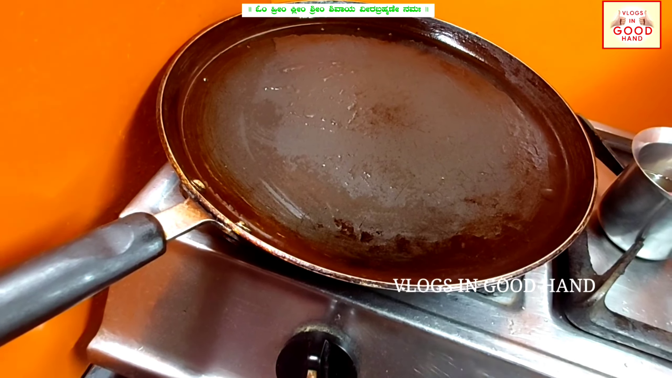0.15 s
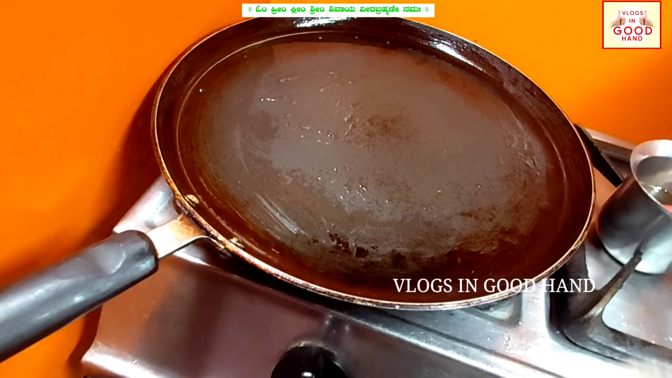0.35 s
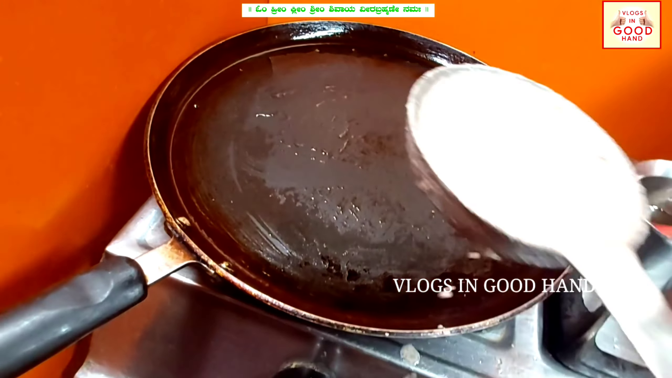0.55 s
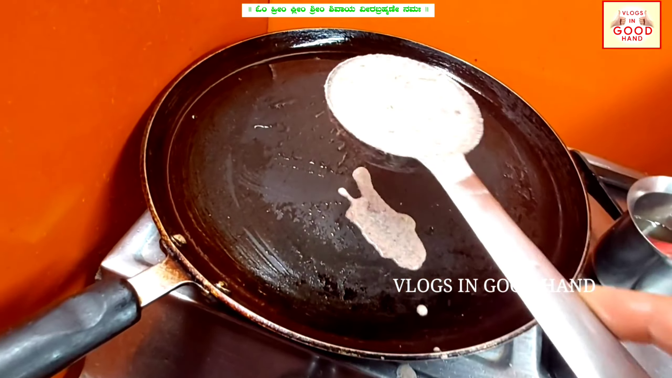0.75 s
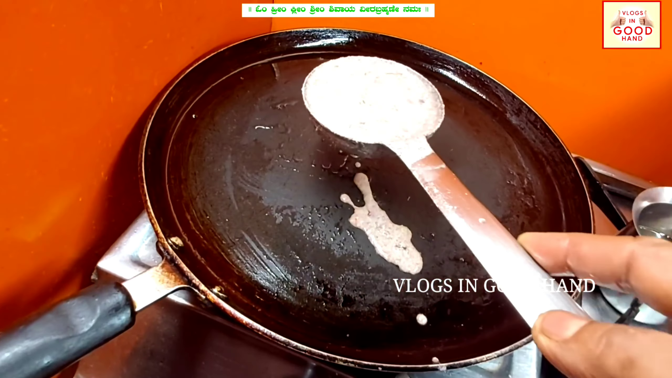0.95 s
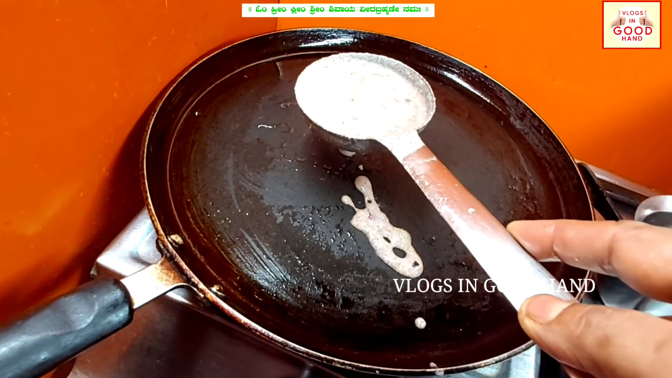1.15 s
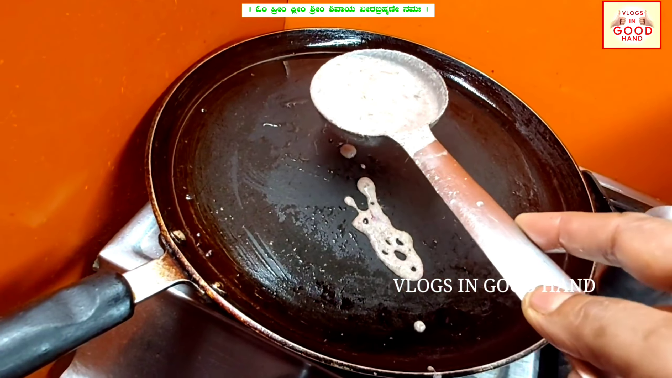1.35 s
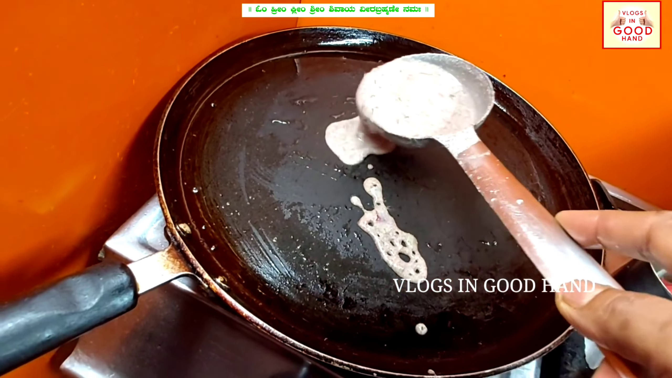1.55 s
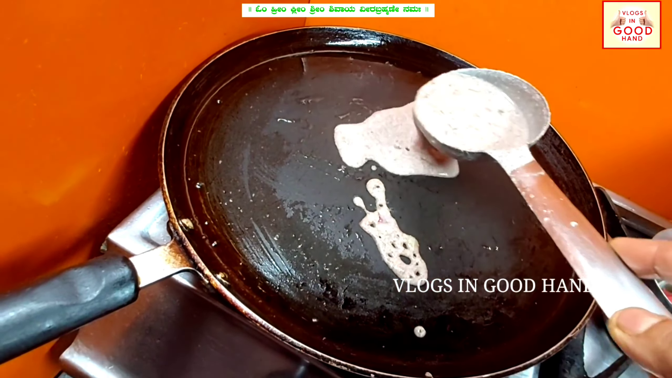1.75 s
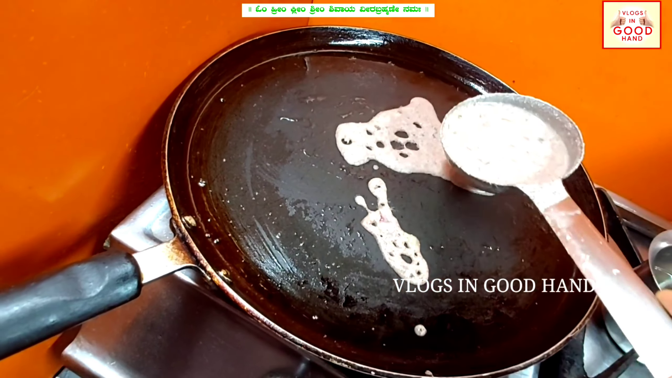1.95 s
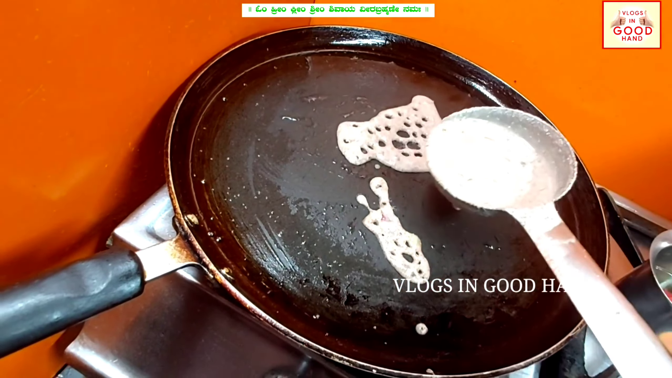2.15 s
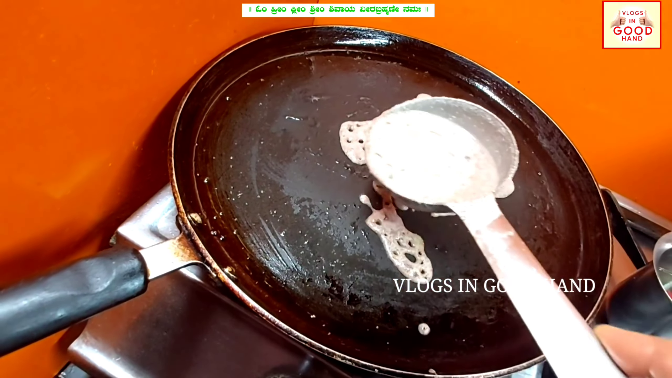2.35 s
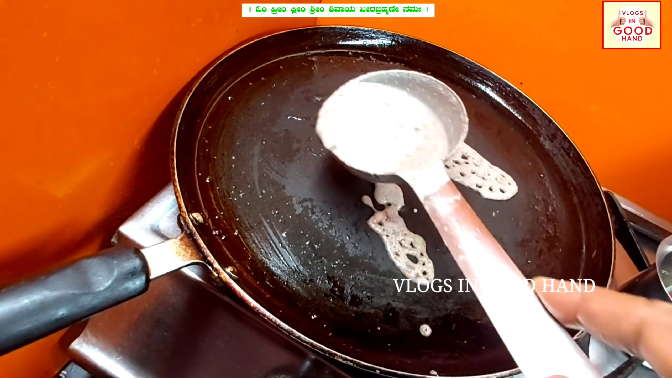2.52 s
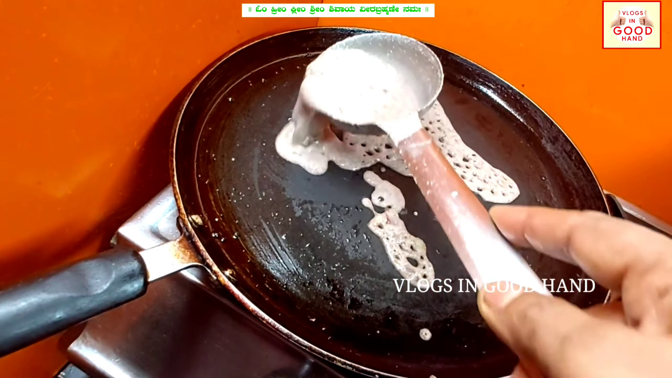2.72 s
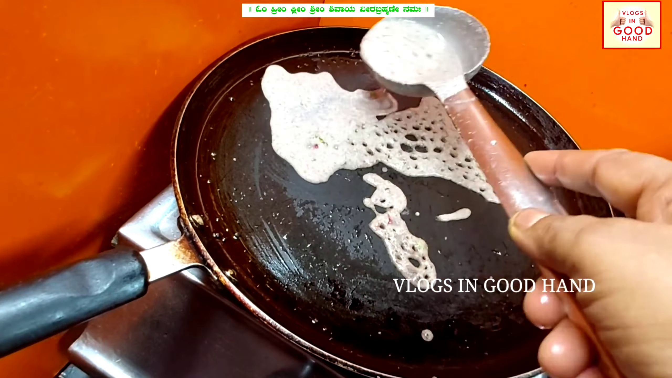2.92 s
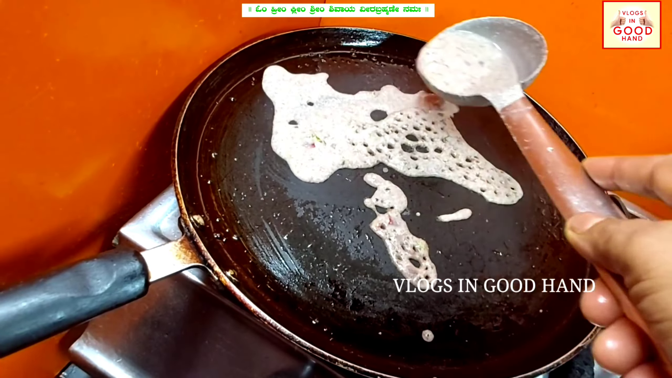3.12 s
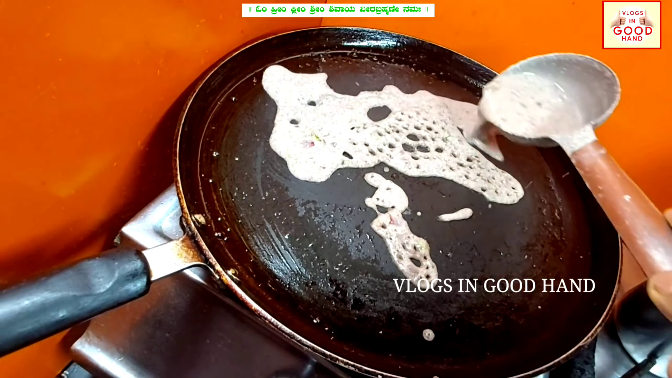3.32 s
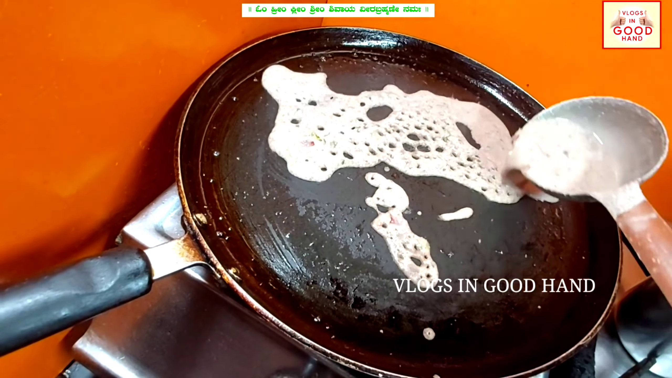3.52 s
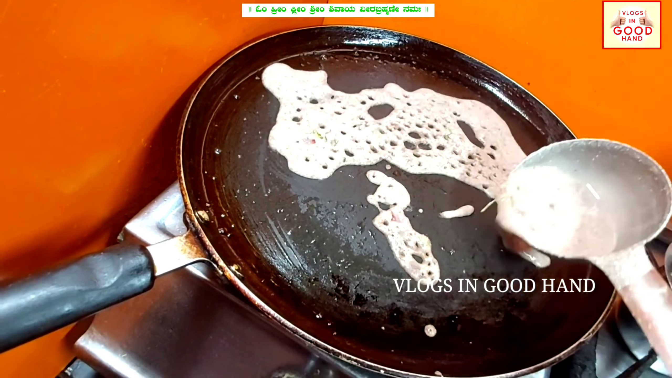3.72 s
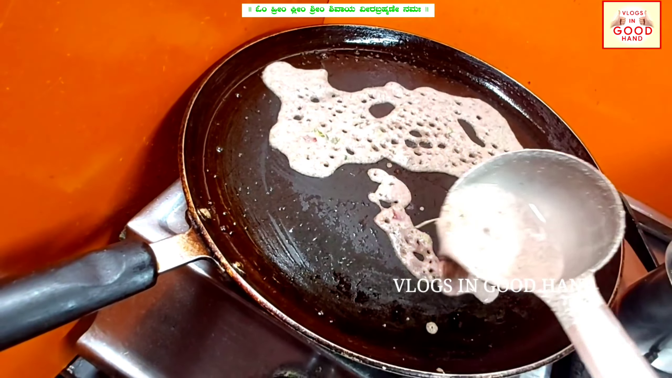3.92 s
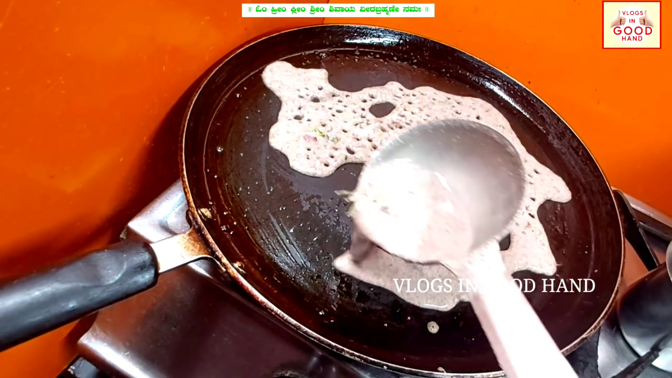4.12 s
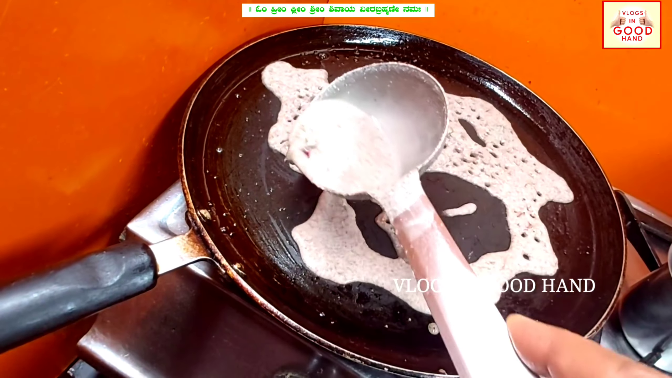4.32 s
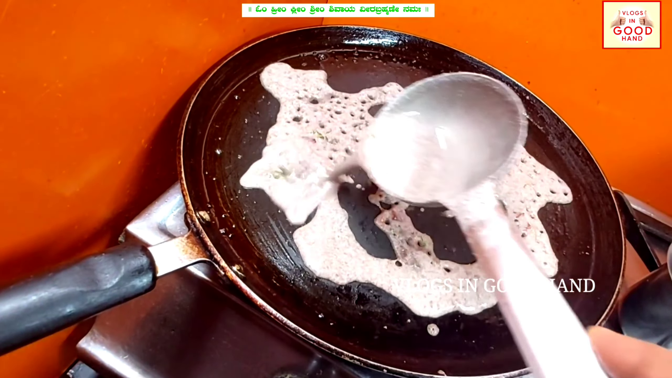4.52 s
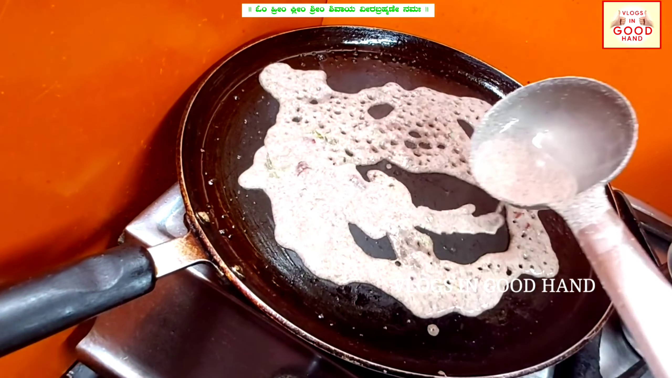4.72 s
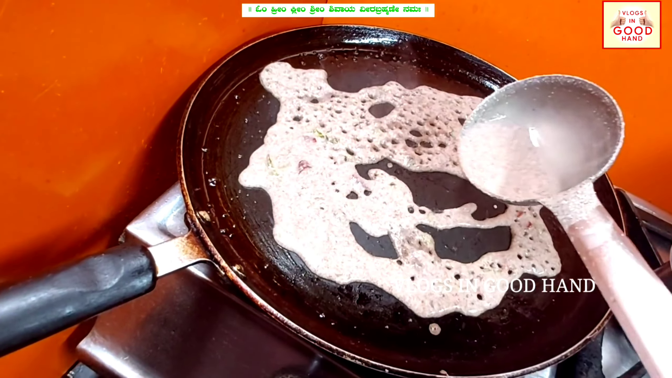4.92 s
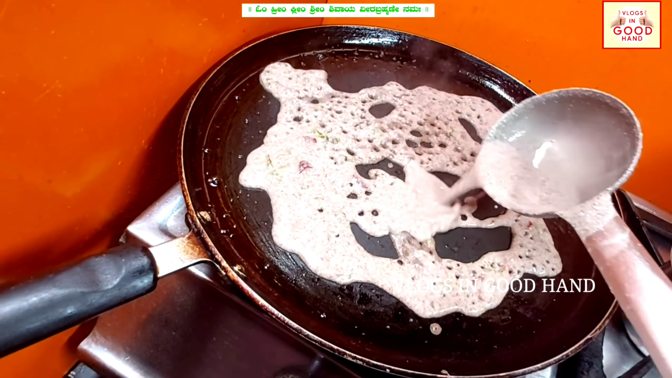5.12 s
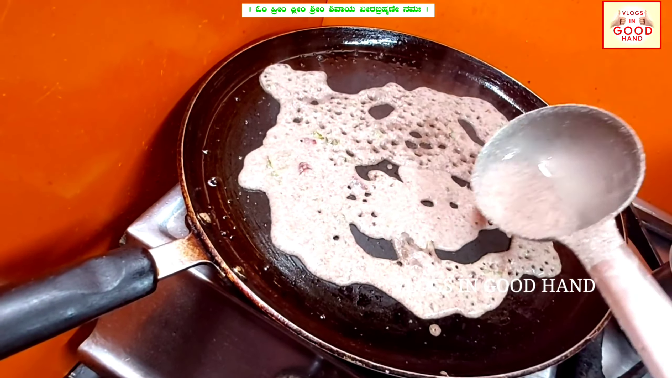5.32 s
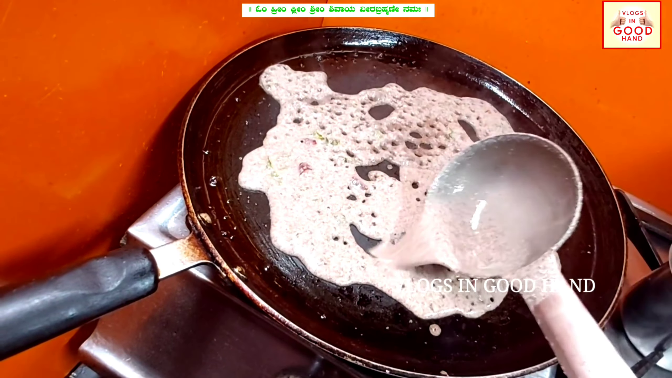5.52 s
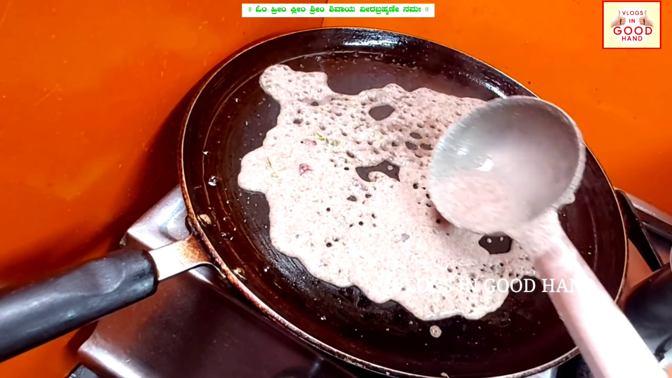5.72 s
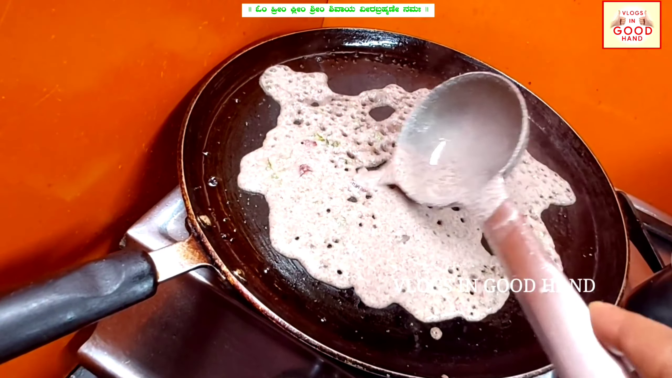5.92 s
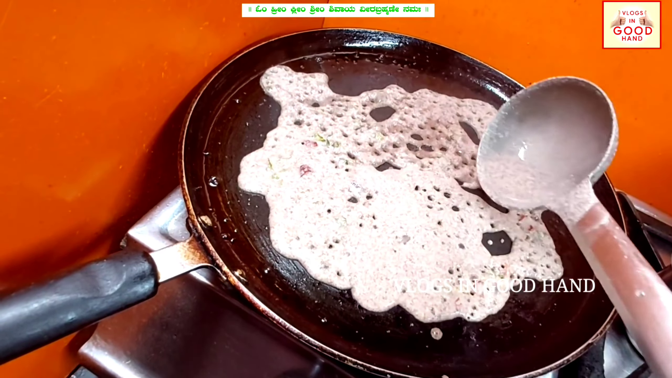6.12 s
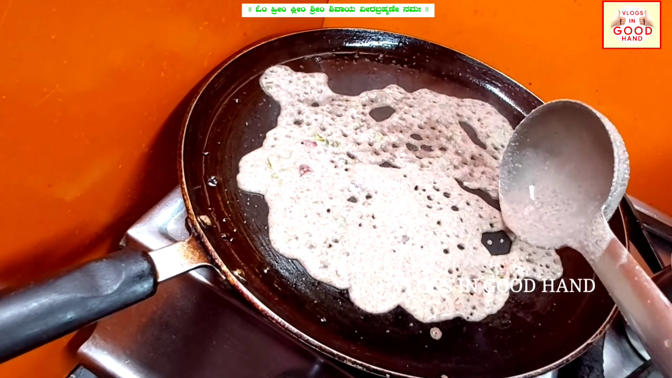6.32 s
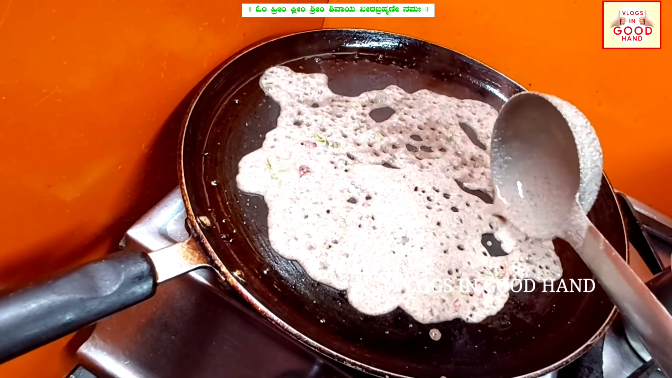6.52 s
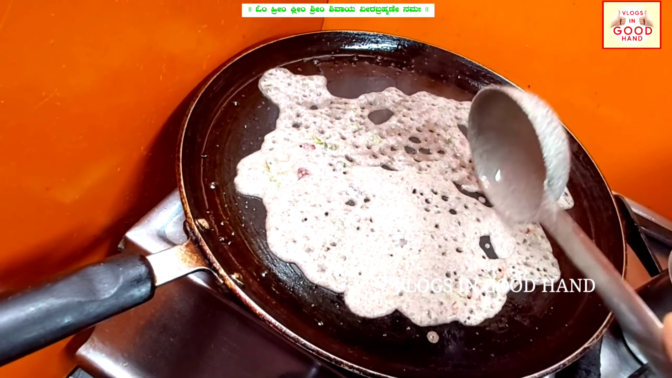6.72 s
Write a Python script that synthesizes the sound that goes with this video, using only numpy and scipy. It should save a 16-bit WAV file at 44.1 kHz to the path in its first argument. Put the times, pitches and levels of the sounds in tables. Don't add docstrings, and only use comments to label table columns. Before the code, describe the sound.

Thin batter lands on a hot oiled griddle, bursting into loud wet sizzle with fizzing steam, blunt bubble pops and sharp oil spits, heard close.

```python
import sys
import numpy as np
from scipy import signal
from scipy.fft import rfft, irfft
from scipy.io import wavfile
from scipy.ndimage import uniform_filter1d

SR = 44100
rng = np.random.default_rng(int(sys.argv[2]) if len(sys.argv) > 2 else 0)


def file_out(sig):
    cols = np.atleast_2d(sig).T
    lim = np.clip(cols, -1, 1)
    pcm = np.round(lim * 32767).astype(np.int16)
    wavfile.write(sys.argv[1], SR, pcm)


def decibels_to_gain(level_db):
    exponent = np.asarray(level_db, float) / 20
    return 10 ** exponent


N = 302526
T = np.arange(N) / SR
LAG_S = 0.00018

# start_s, level_db, dullness_db (of the lower part, rises as batter covers metal)
BOILING = [(.66, -66, 4.5), (.78, -41.5, -11), (.83, -25.5, -29), (.9, -22.5, -16.5), (.98, -26, -5),
           (1.21, -32.5, -6.5), (1.31, -28.5, -8.5), (1.45, -30.5, -8), (1.66, -33.5, -5.5),
           (1.73, -22.5, -20.5), (1.88, -21, -11), (2.15, -26, -1.5), (2.2, -30, -2.5), (2.82, -32, -7),
           (2.92, -25.5, -8.5), (3.5, -22.5, -6.5), (4.99, -27, 0.5), (6.86, -33.5, 2.5)]
# start_s, level_db
FIZZ_START = [(.66, -56), (.664, -47), (.739, -41), (.744, -33), (.8, -29), (.83, -24.5)]


def boil():
    # frequency_hz, density_db (per Hz)
    body_colour = [(350, -32), (600, -18), (977, -13.5), (1230, -17), (1460, -7.5), (1850, -6),
                   (2380, -3.5), (2890, -3.5), (3120, -6), (3330, -2), (4040, -4), (5190, -16),
                   (5780, -9.5), (6580, -23), (8000, -18), (10400, -52), (17600, -120)]
    # frequency_hz, width_hz, left_db, right_db
    weak_modes = [(980, 46, -27.5, -30), (1096, 32, -21, -22.5), (1410, 11, -46.5, -13.5),
                  (1580, 84, -20, -55), (1732, 6.7, -24.5, -14.5), (2053, 16.7, -13.5, -19),
                  (2757, 28, -14, -40), (2826, 27, -18.5, -53), (4180, 43, -7, -10.5),
                  (4417, 38, -14.5, -7.5), (4713, 43, -10, -13), (5080, 30, -10, -31), (6030, 31, -19, -30),
                  (6130, 86, -17, -50)]
    # frequency_hz, width_hz, left_db, right_db, group
    strong_modes = [(2400, 85, -8, -20, 1), (3070, 90, -4, -19, 2), (3165, 110, -4, -19, 2),
                    (3432, 65, -7, -18, 3), (3503, 60, -4, -16, 3), (3890, 110, -8, -18, 4),
                    (3985, 110, -4, -11, 4)]
    # start_s, length_s, drive_db
    ringing = [
        [(.93, .02, -23), (1.28, .02, -32.5), (1.74, .4, -27.5), (2.0, .04, -12), (2.32, .02, -23),
         (3.02, 2.5, -29), (4.75, .32, -29), (5.36, .02, -26), (6.3, 0.17, -30)],
        [(.93, .05, -32), (1.78, 0.27, -25), (2.88, 1.24, -26), (4.2, 0.77, -30)],
        [(.83, 0.26, -24.5), (1.26, 0.056, -30), (1.78, .3, -26), (2.1, 0.022, -20), (2.98, .02, -25),
         (3.4, 0.6, -29.5), (4.0, 0.68, -31), (5.36, .02, -40)],
        [(.84, 0.081, -26.5), (1.27, 0.13, -27.5), (1.72, 0.2, -24.5), (2.75, .4, -34), (3.35, 0.66, -27),
         (4.1, 0.41, -30)],
    ]

    strikes = rng.standard_normal((2, N)) - .7 * evened(bursts(5000, 3.0))
    dullness_db = curve(BOILING, 2)

    low_hz, high_hz = 1340, 3320

    def body_db(hz, t):
        share = np.clip(np.log(high_hz / (hz + 1)) / np.log(high_hz / low_hz), 0, 1)
        return read(body_colour, hz) + share * (curve(BOILING, 2, t) + 6)

    body = coloured(strikes, body_db, patchy_db=1.19)

    early = np.roll(strikes[0], -round(LAG_S * SR))
    metal = evened(np.array([strikes[0], early + 0.34 * strikes[1]]))
    weak = np.zeros((2, N))
    for hz, width_hz, left_db, right_db in weak_modes:
        mode = evened(wavering(3) * resonate(metal, hz, 1.5 * width_hz))
        weak += decibels_to_gain(np.array([[left_db], [right_db]])) * mode

    damping_db = 0.28 * np.clip(dullness_db + 8, 0, 12)
    lean_db = -1.07 - 0.32 * np.maximum(dullness_db, -20)
    level = decibels_to_gain(curve(BOILING, 1)) * wavering(0.46) * sides(lean_db)
    out = level * (decibels_to_gain(3.0) * evened(body) + decibels_to_gain(-3.0 - damping_db) * weak)

    idle_db = curve(BOILING, 1) - 13
    range_db = 18
    drives = []
    for rows in ringing:
        drive_db = spells(rows, rise_db_per_s=400, fall_db_per_s=141)
        drives.append(decibels_to_gain(np.clip(drive_db, idle_db, idle_db + range_db)))
    for hz, width_hz, left_db, right_db, group in strong_modes:
        mode = resonate(resonate(metal, hz, width_hz), hz, 1.5 * width_hz)
        mode = evened(wavering(2.2) * mode)
        out += drives[group - 1] * decibels_to_gain(4.5 + np.array([[left_db], [right_db]])) * mode
    return out


def fizz():
    fizz_level = FIZZ_START + [(.86, -29), (1.04, -27.5), (1.64, -32), (1.83, -28), (2.15, -27.5),
                  (2.45, -29.5), (3.02, -30.5), (3.38, -28), (3.63, -28), (4.35, -29), (5.7, -30.5),
                  (6.86, -32.5)]
    # frequency_hz, density_db (per Hz)
    hiss_colour = [(1760, -20), (3000, -5.5), (3870, -16.5), (4240, -6), (6020, -7), (6540, -3),
                   (7510, -5.5), (9050, -4), (14600, -2), (15600, -6)]

    decay_s = .01
    flares = signal.lfilter([1], [1, -np.exp(-1 / (decay_s * SR))], bursts(40, 3.0).sum(0))
    hiss = rng.standard_normal((2, N)) - .7 * evened(bursts(5000, 3.0))
    hiss = hiss * (1 + .09 * flares)
    hiss = coloured(hiss, lambda hz, t: read(hiss_colour, hz), patchy_db=1.0, size=256)
    lean_db = -0.9 + 0.35 * np.maximum(curve(BOILING, 2), -20)
    return decibels_to_gain(curve(fizz_level, 1) + 6.5) * wavering(0.26) * sides(lean_db) * evened(hiss)


def gurgle():
    # start_s, level_db, deepest_db (its deepest part swells apart)
    gurgle_level = [(.74, -56, -3.5), (1.03, -39.5, -1), (1.42, -41, -7), (1.7, -50, -14), (2.2, -39.5, -2),
                    (2.5, -42.5, -2.5), (3.03, -47.5, -14), (3.3, -43.5, -9.5), (5.2, -40.5, -4.5),
                    (5.8, -41.5, -5), (6.04, -45.5, -22), (6.86, -43.5, -6)]
    # frequency_hz, density_db (per Hz)
    wash_colour = [(15, -52), (25, -17), (205, -7.5), (302, -0.5), (403, -4.5), (634, -6), (1120, -3.5),
                   (1290, -9), (1400, -23), (1820, -32), (3080, -120)]

    def wash_db(hz, t):
        deep = np.clip(np.log(250 / (hz + 1)) / np.log(2), 0, 1)
        return read(wash_colour, hz) + deep * (curve(gurgle_level, 2, t) + 9)

    puffs = 0.66 * rng.standard_normal((2, N)) - evened(bursts(500, 3.0))
    wash = coloured(puffs, wash_db, patchy_db=2.5, size=1024)
    return decibels_to_gain(curve(gurgle_level, 1)) * evened(wash)


def pops():
    # start_s, level_db (of their low part)
    left_bubbles = [
        (0.7654, -37),
        (0.7827, -28),
        (0.7901, -29),
        (0.8393, -28),
                    (0.8682, -18), (0.9286, -22), (0.951, -20.5), (0.9718, -19), (1.0819, -17.5),
                 (1.167, -22.5), (1.194, -23), (1.2037, -19.5), (1.2112, -21), (1.6342, -21.5),
                 (2.0427, -21.5), (2.1806, -22), (2.2872, -15.5), (2.3837, -23.5), (2.4823, -22),
                 (2.6687, -23.5), (3.419, -17.5), (3.9057, -21), (4.0397, -22.5), (4.325, -22),
                 (4.499, -23), (4.8013, -18.5), (4.9353, -25), (4.966, -26), (5.5245, -24), (5.7787, -25),
                 (6.5139, -23), (6.727, -24), (6.7657, -28), (6.8403, -28)]
    # start_s, level_db (of their low part)
    right_pops = [(0.804, -26.5), (1.6513, -22), (2.009, -29), (2.788, -28), (3.392, -27), (3.5612, -25),
                  (3.8424, -30), (4.0916, -22.5), (5.141, -32), (5.7106, -33), (5.8935, -31)]

    t = np.arange(-30, 270) / SR
    dip = np.exp(-.5 * (t / .000085) ** 2)
    rebound = (t > 0) * np.sin(2 * np.pi * 270 * t) * np.exp(-t / 0.0025)
    pulse = .085 * rebound - dip

    small_per_s, small_from_s = 5, .85
    small = (rng.random(N) < small_per_s / SR) * (T > small_from_s)
    left = small * decibels_to_gain(-29 + 4 * rng.standard_normal(N))
    right = np.zeros(N)
    for train, rows in ((left, left_bubbles), (right, right_pops)):
        start_s, level_db = np.transpose(rows)
        train[np.round((start_s + t[0]) * SR).astype(int)] = decibels_to_gain(level_db)

    left_spill_db, right_spill_db = -32, -4.5
    ports = np.array([left + decibels_to_gain(right_spill_db) * right, right + decibels_to_gain(left_spill_db) * left])
    port_gain = decibels_to_gain(np.array([[10], [7]]))
    return signal.oaconvolve(ports * port_gain, pulse[None])[:, :N]


def spits():
    # start_s, peak_db, pan_db (left-right)
    oil_spits = [(1.3874, -18, 6.0), (1.6504, -10.5, 6.5), (2.2036, -17, 8), (2.244, -13, 8.5),
                 (2.2844, -14, 5.0), (2.6556, -13.5, 4), (2.9424, -12, 4), (3.0177, -21, 2),
                 (3.0981, -23, 0.5), (3.3854, -17, -5), (3.4947, -8, 10.5), (3.7456, -20, 10),
                 (3.8412, -9, 5.5), (3.9656, -16, 8), (4.3806, -17, 5.5), (4.9532, -3, 3),
                 (5.1728, -18, 5.0), (5.5631, -9, 14.5), (5.623, -10, 1.5), (5.744, -25, 4),
                 (5.7974, -14, 7.0), (6.0045, -14, 25), (6.1855, -9.5, 12), (6.3307, -12, 7.5),
                 (6.7243, -9, 7.5), (6.7847, -18, 10)]

    t = np.arange(900) / SR
    out = np.zeros((2, N + 900))
    attack = np.minimum(t / 0.00027, 1)
    shape = attack * (np.exp(-t / 0.00096) + 0.24 * np.exp(-t / .008))
    for start_s, peak_db, pan_db in oil_spits:
        noise = rng.standard_normal((2, 900))
        squirt = evened(resonate(resonate(noise, 13300, 5000), 13000, 6000))
        out[:, round(start_s * SR):][:, :900] += decibels_to_gain(peak_db - 10.5) * sides(pan_db)[:, None] * shape * squirt
    return out[:, :N]


def drips():
    # start_s, thud_db, ring_db, hiss_db, t60_s
    first_drips = [
        (.42, -65, -90, -90, .1),
        (.5812, -59, -53, -64, .25),
        (.6008, -58, -48, -46, .13),
        (.678, -64, -44, -72, .03),
    ]
    # frequency_hz, width_hz, level_db
    drip_modes = [(1100, 350, -1), (2100, 450, -3), (3000, 1800, -3)]

    t = np.arange(6000) / SR
    out = np.zeros((2, N))
    for start_s, thud_db, ring_db, hiss_db, t60_s in first_drips:
        noise = rng.standard_normal((2, 6000))
        noise = noise + noise[0]
        thud = evened(resonate(resonate(noise, 200, 300), 200, 400))
        ring = np.zeros((2, 6000))
        for hz, width_hz, level_db in drip_modes:
            ring += decibels_to_gain(level_db) * evened(resonate(resonate(noise, hz, width_hz), hz, 2 * width_hz))
        hiss = evened(resonate(noise, 13000, 9000)) * (.2 + decibels_to_gain(-60 * t / .04))
        drip = decibels_to_gain(thud_db - 60 * t / 0.42) * thud
        drip += decibels_to_gain(-60 * t / t60_s) * (decibels_to_gain(ring_db) * evened(ring) + decibels_to_gain(hiss_db) * hiss)
        out[:, round(start_s * SR):][:, :6000] += sides(5.2)[:, None] * drip
    return out


def kitchen():
    # frequency_hz, density_db (per Hz)
    room_colour = [(15, -30), (30, -10), (95, 0), (220, -12), (330, -11), (480, -17), (750, -26),
                   (2700, -27), (4300, -30), (5800, -36), (6200, -24), (8300, -25), (9700, -27),
                   (11300, -19), (12800, -27), (15600, -28)]
    noise = rng.standard_normal((2, N))
    room = coloured(noise, lambda hz, t: read(room_colour, hz), patchy_db=1.0, size=1024)
    return decibels_to_gain(-68) * evened(room)


def hollowed(x):
    # start_s, length_s, depth_db
    ladle_shades = [(.87, .04, 8), (.99, 0.13, 21), (1.28, .28, 15), (1.6, 0.042, 17.5), (1.83, .02, 8),
                    (2.13, 0.037, 18), (2.41, .03, 13), (3.26, .04, 19), (4.35, 0.037, 16), (4.55, .02, 22),
                    (5.0, .06, 3), (5.38, 0.22, 9), (6.03, .1, 11), (6.58, .03, 16)]
    hz, width_hz = 6620, 700
    band = signal.filtfilt(*signal.iirpeak(hz, hz / width_hz, SR), x)
    depth_db = np.maximum(spells(ladle_shades, 259, 259), 3.5)
    kept = np.clip(decibels_to_gain(-depth_db), .05, 1)
    return x - (1 - kept) * band


def coloured(x, gain_db, patchy_db, size=512):
    # frequency_hz, left_minus_right_db
    port_lean = [(60, 4), (99, 14), (160, 8.5), (270, 10), (450, 5), (740, 4.5), (1220, 14.5), (2010, 9),
                 (3330, 13), (5500, 0.5), (9080, 6), (15000, 11)]
    # frequency_hz, coherence
    port_likeness = [(60, -0.67), (120, 0.98), (240, 0.36), (480, 0.71), (950, 0.84), (1890, 0.078),
                     (3770, -0.378), (7520, 0.039), (15000, 0.16)]

    hz, t, z = signal.stft(x, SR, nperseg=size, noverlap=size * 3 // 4)
    patches = rng.standard_normal(z.shape[:0:-1]).T
    patches = evened(uniform_filter1d(uniform_filter1d(patches, 6, 0), 24, 1))
    same = np.clip(read(port_likeness, hz), 0, .95)[:, None]
    early = np.exp(2j * np.pi * hz * LAG_S)[:, None]
    z = np.array([z[0], same * early * z[0] + np.sqrt(1 - same ** 2) * z[1]])
    z = z * decibels_to_gain(gain_db(hz[:, None], t) + patchy_db * patches)
    z = z * sides(read(port_lean, hz))[:, :, None]
    return signal.istft(z, SR, nperseg=size, noverlap=size * 3 // 4)[1][:, :N]


def bursts(per_s, spread_db):
    luck = np.minimum(rng.exponential(1, (2, N)), 3.5)
    size = np.zeros((2, N))
    hit = rng.random((2, N)) < per_s / SR
    size[hit] = decibels_to_gain(spread_db * luck[hit])
    return size


def resonate(x, hz, width_hz):
    return signal.lfilter(*signal.iirpeak(hz, hz / width_hz, SR), x)


def wavering(db):
    steps = rng.standard_normal(round(N / SR * 20) + 2)
    return np.interp(T * 20, np.arange(len(steps)), decibels_to_gain(db * steps))


def spells(rows, rise_db_per_s, fall_db_per_s):
    t = T[::64]
    start, length, db = np.transpose(rows)[:, :, None]
    ramps = np.maximum(rise_db_per_s * (start - t), fall_db_per_s * (t - start - length))
    return np.interp(T, t, (db - np.maximum(ramps, 0)).max(0))


def evened(x):
    return x / np.sqrt(np.mean(x ** 2) + 1e-20)


def read(points, hz):
    f, value = np.transpose(points)
    return np.interp(np.log(hz + 1), np.log(f + 1), value)


def curve(rows, column, t=T):
    rows = np.array(rows)
    return np.interp(t, rows[:, 0], rows[:, column], left=-120)


def sides(db):
    return decibels_to_gain(np.array([db / 2, -db / 2]))


def scene():
    return hollowed(boil() + fizz()) + gurgle() + pops() + spits() + drips() + kitchen()


def top_cut(x):
    return signal.sosfilt(signal.butter(12, 16130, fs=SR, output="sos"), x)


def record(dry):
    # frequency_hz, gain_db
    bass_cut = [(20, -14), (45, -6.5), (70, 0)]
    limit = 1.3
    spectrum = rfft(np.tanh(dry / limit) * limit)
    port = irfft(spectrum * decibels_to_gain(read(bass_cut, np.fft.rfftfreq(N, 1 / SR))), N)
    edge = signal.firwin(1023, 15560, window=("kaiser", 9), fs=SR)
    return top_cut(signal.oaconvolve(port, edge[None], "same"))


dry = scene()
out = record(dry)
file_out(out)
```